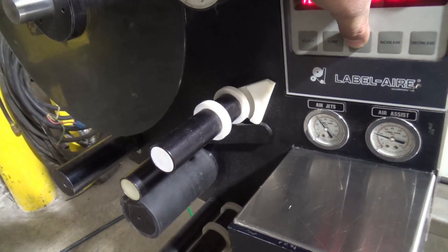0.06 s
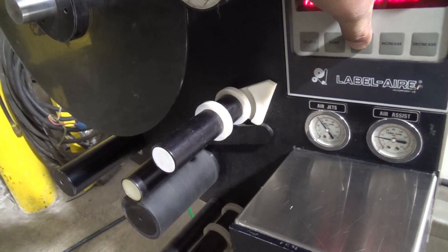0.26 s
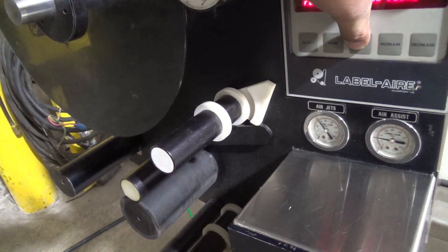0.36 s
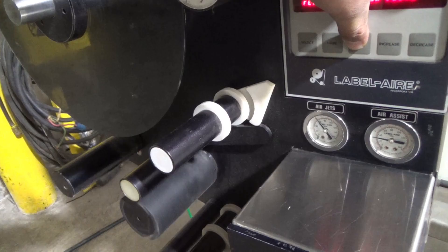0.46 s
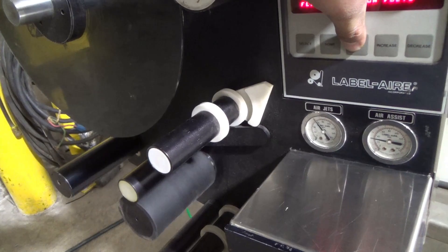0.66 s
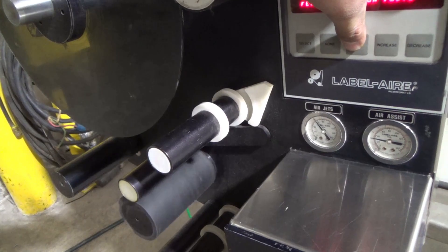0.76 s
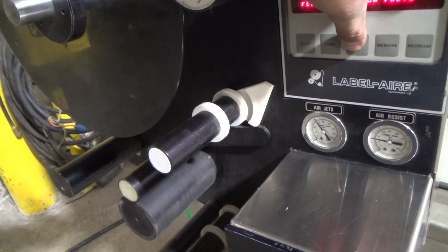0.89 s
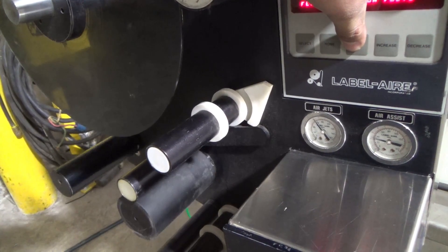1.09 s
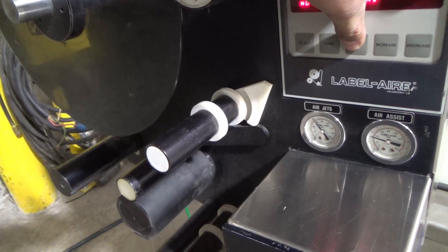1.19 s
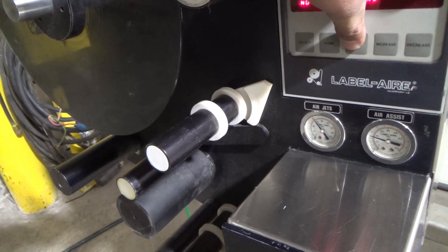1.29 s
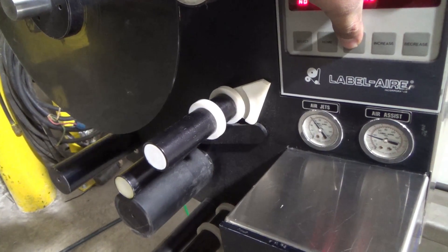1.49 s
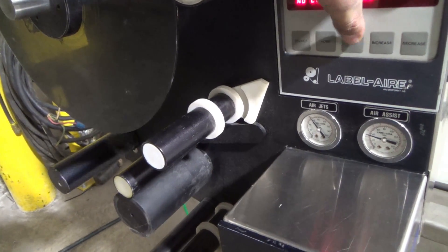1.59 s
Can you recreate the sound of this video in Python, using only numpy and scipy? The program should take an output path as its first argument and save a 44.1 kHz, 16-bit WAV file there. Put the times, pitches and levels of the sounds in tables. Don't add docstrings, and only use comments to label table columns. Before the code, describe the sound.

A loud compressed air blast in an indoor workshop, heard from a short distance. Fans and a motor drone steadily, slightly to the right. Around 0.2 seconds a valve clicks and snaps open, and a bright, piercing hiss bursts out, swelling slightly. At about 1.1 seconds it shuts with a knock and low airy thud, leaving a brief room tail as the drone, dipped by automatic gain, creeps back.

```python
import sys
import numpy as np
from scipy import signal
from scipy.fft import rfft, irfft
from scipy.io import wavfile

SR = 44100
rng = np.random.default_rng(int(sys.argv[2]) if len(sys.argv) > 2 else 0)


def wav_out(sig):
    wavfile.write(sys.argv[1], SR, np.round(np.clip(np.atleast_2d(sig).T, -1, 1) * 32767).astype(np.int16))


def voltage_ratio(decibels):
    exponent = np.asarray(decibels, float) / 20
    return 10 ** exponent


N = 72765
TIME = np.arange(N) / SR
BIN_HZ = np.arange(N // 2 + 1) * SR / N
LEFT_RIGHT = np.array([[1], [-1]])
OPEN_S, SHUT_S = 0.2289, 1.1294
CUTOFF_HZ = 15750


def at_hz(points, hz):
    f, value = np.transpose(points)
    return np.interp(np.log(hz), np.log(f), value)


def drift(rate_hz):
    r = np.exp(-2 * np.pi * rate_hz / SR)
    wander = signal.lfilter([1], [1, -2 * r, r * r], rng.standard_normal(N + SR))[SR:]
    return (wander - wander.mean()) / wander.std()


def filtered(x, order, hz, kind):
    return signal.sosfilt(signal.butter(order, hz, kind, fs=SR, output="sos"), x)


def coloured(spectrum, peaks, dips, flicker_db, rate_hz, count):
    hz = np.maximum(BIN_HZ, 1)
    power = voltage_ratio(at_hz(spectrum, hz)) ** 2
    for f, width, db in peaks:
        power = power + voltage_ratio(db) ** 2 / (1 + (2 * (hz - f) / width) ** 2) ** 2
    for f, width, depth in dips:
        power = power * (1 - depth / (1 + (2 * (hz - f) / width) ** 2)) ** 2
    noise = rfft(rng.standard_normal((2, N))) * np.sqrt(power) * (hz > 20)
    noise = noise / irfft(noise[0], N).std()
    centres = np.geomspace(80, 15000, count)
    place = np.interp(np.log(hz), np.log(centres), np.arange(count))
    bands = []
    for k in range(count):
        overlap = np.clip(1 - abs(place - k), 0, 1)
        bands.append(irfft(noise * overlap, N) * voltage_ratio(flicker_db * drift(rate_hz)))
    return centres, bands


# frequency [Hz], density [dB per Hz].
FAN_COLOUR = [(50, -57), (155, -8.5), (507, -2.5), (1020, -10), (1870, -14.5), (4900, -25), (11000, -35),
              (16000, -41)]
# frequency [Hz], width [Hz], level [dB].
DUCT_RESONANCES = [(540, 104, -8.5), (1480, 560, -9), (2593, 115, -12), (4036, 160, -12),
                   (4804, 740, -16.5), (5500, 140, -22)]
# frequency [Hz], level [dB rms].
MOTOR_TONES = [(120, -53), (685, -36.5), (15720, -77)]
# frequency [Hz], left minus right [dB].
DRONE_LEAN = [(60, 0.0), (110, -0.5), (200, -2.5), (380, -0.5), (700, -4), (1290, -3.5), (2380, -5),
              (4400, -2.0), (8120, -2), (15000, 0.5)]
# frequency [Hz], unrelated part under the middle [dB].
DRONE_WIDTH = [(100, -36), (500, -17), (2000, -26), (3500, -16), (8000, -12), (11500, -8), (14000, -30)]


def workshop():
    half = LEFT_RIGHT / 2
    centres, bands = coloured(FAN_COLOUR, DUCT_RESONANCES, [], flicker_db=1.0, rate_hz=11.6, count=14)
    fans = 0
    for hz, (middle, own) in zip(centres, bands):
        spread = voltage_ratio(at_hz(DRONE_WIDTH, hz)) * own * LEFT_RIGHT
        fans = fans + voltage_ratio(at_hz(DRONE_LEAN, hz) * half) * (middle + spread)
    motor = 0
    for hz, db in MOTOR_TONES:
        level = voltage_ratio(db + 3 + 2.5 * drift(8.0) + at_hz(DRONE_LEAN, hz) * half)
        motor = motor + level * np.sin(2 * np.pi * hz * TIME + 0.5 * drift(6.0))
    return voltage_ratio(-27) * fans + motor


def camera_gain():
    def approach(start_s, tau_s):
        return 1 - np.exp(-np.maximum(TIME - start_s, 0) / tau_s)

    duck_db = -6.5 * approach(0.2, 0.0022)
    creep_db = -3.5 * approach(OPEN_S, 0.05)
    recover_db = 5 * approach(SHUT_S, 0.05)
    return voltage_ratio(duck_db + creep_db + recover_db)


# start in seconds, ring [dB], crack [dB], body pitch [Hz], ring T60 [s].
VALVE_CONTACTS = [
    (.2165, -29, -14, 10000, .012),
    (.2289, -13, -1, 1700, .016),
    (1.1298, -15, -18, 1200, .05),
    (1.152, -22, -40, 600, .014),
]
# multiple of the pitch [ratio], level [dB].
BODY_MODES = [(.52, -6), (.93, -7), (1.0, -2), (1.45, -14), (2.25, -10), (3.1, -16)]


def valve():
    snap_s, crack_s = 0.000035, 0.0011
    out = np.zeros((2, N + SR))
    t = np.arange(SR // 8) / SR
    edge = t / snap_s - 2
    snap = 1.6 * edge * np.exp(-edge ** 2 / 2)
    for start_s, ring_db, crack_db, pitch_hz, t60_s in VALVE_CONTACTS:
        detune = rng.normal(1, 0.018, len(BODY_MODES))
        noise = rng.standard_normal((2, len(t)))
        ring = 0
        for (multiple, db), off in zip(BODY_MODES, detune):
            hz = multiple * pitch_hz
            if hz < CUTOFF_HZ * 0.9:
                ring = ring + voltage_ratio(ring_db + db - 60 * t / t60_s) * np.sin(2 * np.pi * hz * off * t)
        grit = np.exp(-t / crack_s) * (0.32 * noise[0] + 0.1 * noise[1] * LEFT_RIGHT)
        first = int(start_s * SR)
        out[:, first:first + len(t)] += ring + voltage_ratio(crack_db) * (snap + grit)
    return filtered(out[:, :N] + 1e-18, 3, 300, "high")


# frequency [Hz], density [dB per Hz].
JET_COLOUR = [(100, -62.5), (500, -17.5), (1000, -18.5), (2400, -34), (5000, -17.5), (8000, -15),
              (11500, -7.5), (16000, -20.5)]
# frequency [Hz], width [Hz], level [dB].
NOZZLE_RESONANCES = [(2065, 570, -21), (2783, 350, -18), (3460, 860, -16), (4890, 1100, -13.5),
                     (7900, 1450, -12), (8930, 370, -7.5), (10950, 1340, -5.5), (11790, 1100, -3),
                     (13070, 1200, -6), (14850, 700, -8.5)]
# frequency [Hz], width [Hz], depth [0-1].
PLATE_DIPS = [(2500, 170, 0.03), (12800, 280, 0.02), (14500, 300, 0.5)]
# frequency [Hz], unrelated part under the middle [dB].
JET_SPREAD = [(500, -12), (2000, -31), (5500, -19.5), (8000, -30), (11500, -23), (14000, -30)]
# frequency [Hz], offset [dB].
JET_START = [(2000, 7.5), (8000, -3), (11500, -10), (15000, 4)]


def jet():
    rise_s, swell_db_per_s, vent_db_per_s = 0.011, 2.1, 752
    tail_db, tail_t60_s, tail_dull, tail_width_db = -22, 0.36, 0.84, -11
    centres, bands = coloured(JET_COLOUR, NOZZLE_RESONANCES, PLATE_DIPS, flicker_db=1.0, rate_hz=18.5, count=20)
    starting = np.clip(1 - (TIME - OPEN_S) / rise_s, 0, 1)
    air = 0
    for hz, (middle, own) in zip(centres, bands):
        spread = voltage_ratio(at_hz(JET_SPREAD, hz)) * own * LEFT_RIGHT
        air = air + voltage_ratio(at_hz(JET_START, hz) * starting) * (middle + spread)
    after = np.maximum(TIME - SHUT_S, 0)
    flutter = voltage_ratio(1.2 * drift(300.0) + 0.3 * drift(9.0))
    direct = voltage_ratio(-vent_db_per_s * after) * flutter * air
    middle, own = signal.lfilter([1], [1, -tail_dull], sum(bands)[::-1])
    tail = voltage_ratio(tail_db - 60 * after / tail_t60_s) * (middle + voltage_ratio(tail_width_db) * own * LEFT_RIGHT)
    room = (TIME > SHUT_S) * tail
    leak = voltage_ratio(-17) * (TIME > OPEN_S - 0.002)
    gate = np.where(TIME >= OPEN_S, 1, leak)
    return gate * voltage_ratio(-12 + swell_db_per_s * (TIME - 0.6549)) * (direct + room)


def puff():
    after = TIME - SHUT_S + 0.002
    near = filtered(rng.standard_normal((2, N)), 2, [408, 3050], "band")
    far = filtered(rng.standard_normal((2, N)), 2, [201, 1460], "band")
    thud = voltage_ratio(-21 - 60 * abs(after) / 0.11) * (near[0] + 0.26 * near[1] * LEFT_RIGHT)
    around = far[0] - 0.1 * LEFT_RIGHT * far[0] + 0.25 * far[1] * LEFT_RIGHT
    room = voltage_ratio(-25.5 - 60 * abs(after) / 0.5) * around
    rise = np.clip(after / 0.0024, 0, 1) ** 2
    return 3 * rise * (thud + room)


def scene():
    return workshop() + (valve() + jet() + puff()) / camera_gain()


def band_limit(x):
    return signal.sosfilt(signal.butter(12, 16990, fs=SR, output="sos"), x)


def record(dry):
    ceiling = 0.95
    x = np.tanh(dry * camera_gain() / ceiling) * ceiling
    x = filtered(x, 2, 45, "high")
    x = irfft(rfft(x) * (BIN_HZ < CUTOFF_HZ), N)
    return band_limit(x)


dry = scene()
out = record(dry)
wav_out(out)
```